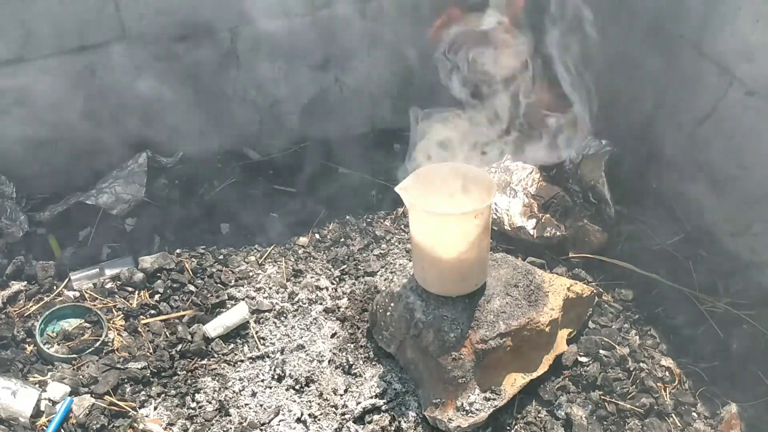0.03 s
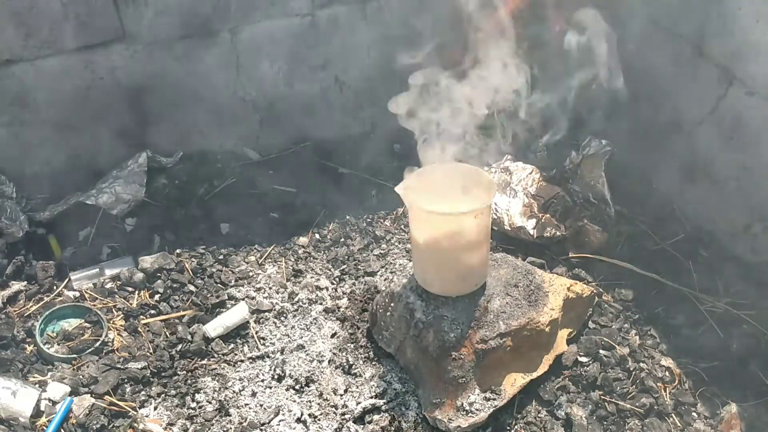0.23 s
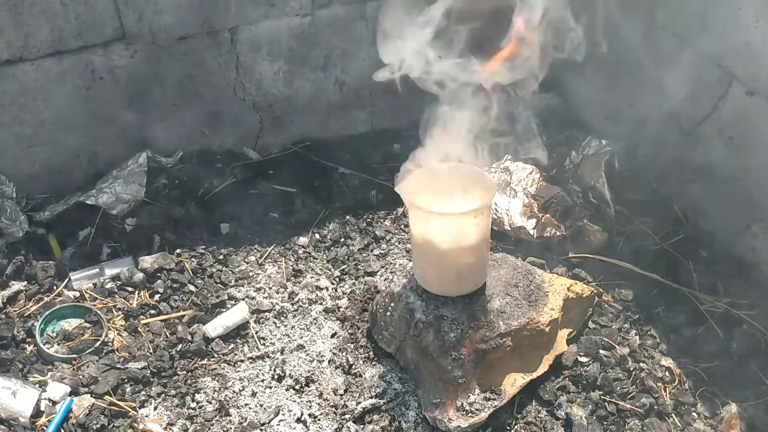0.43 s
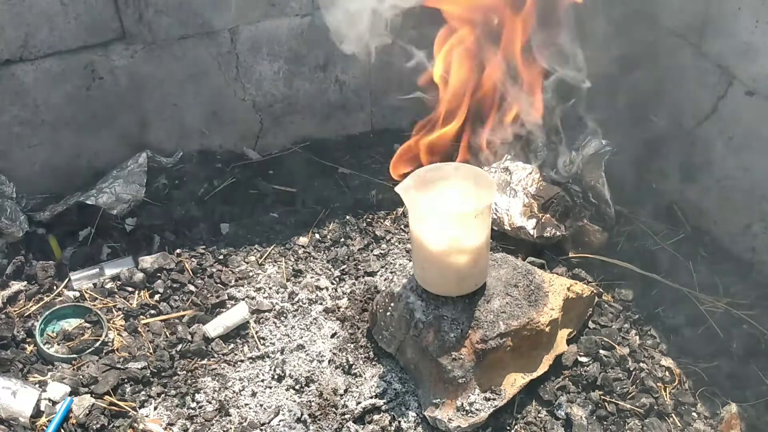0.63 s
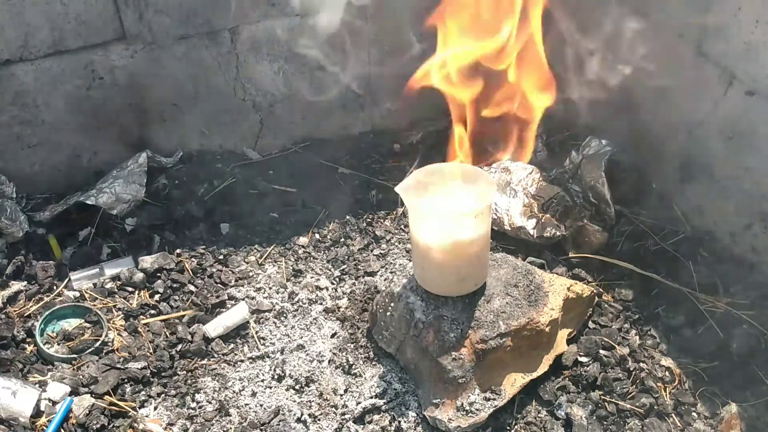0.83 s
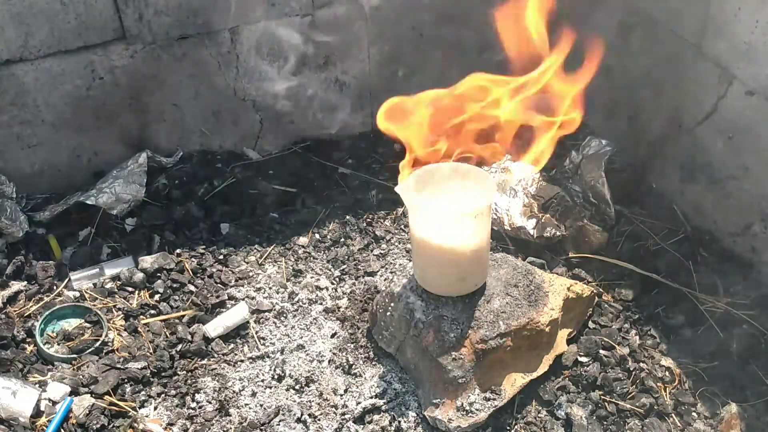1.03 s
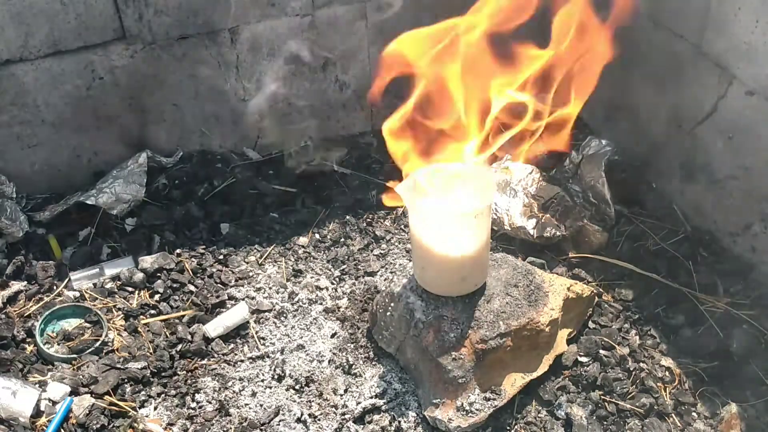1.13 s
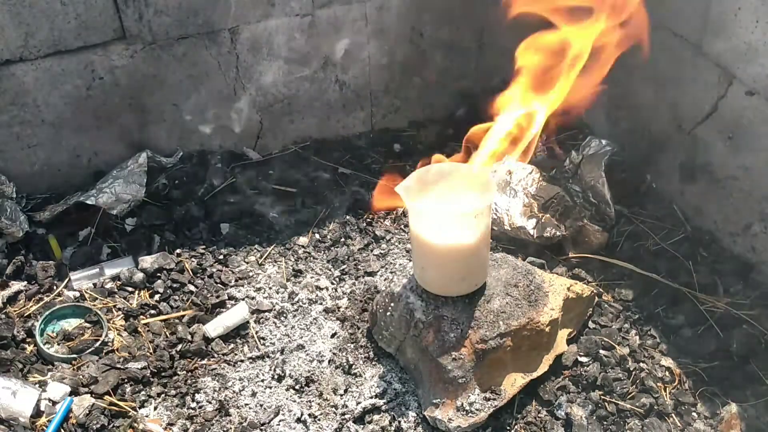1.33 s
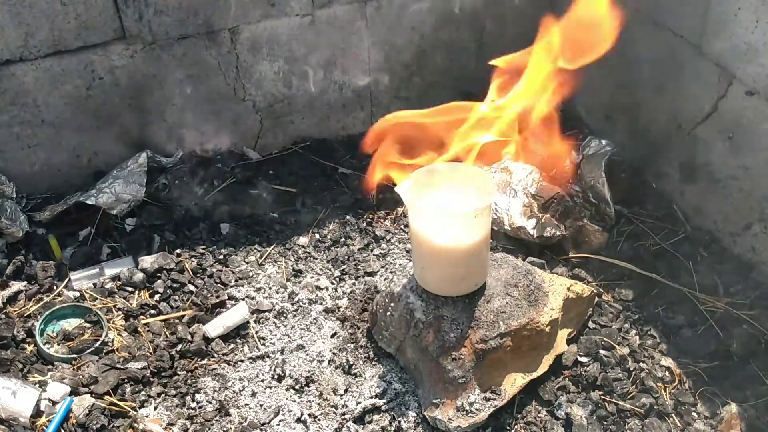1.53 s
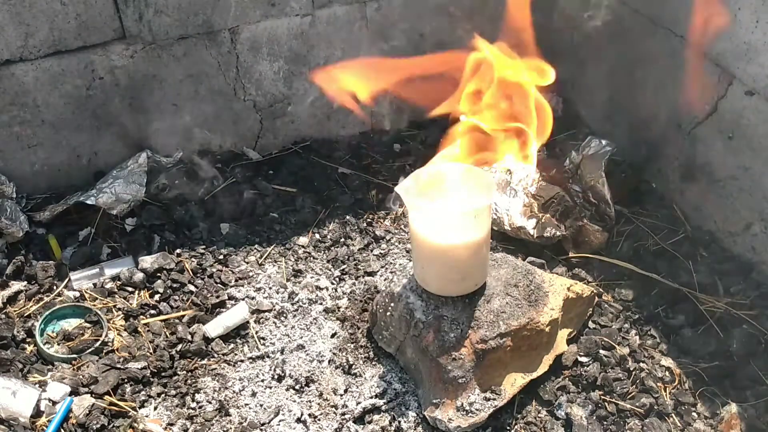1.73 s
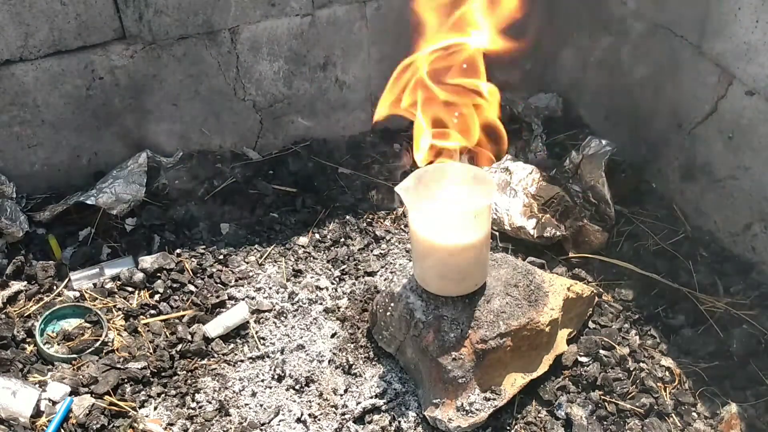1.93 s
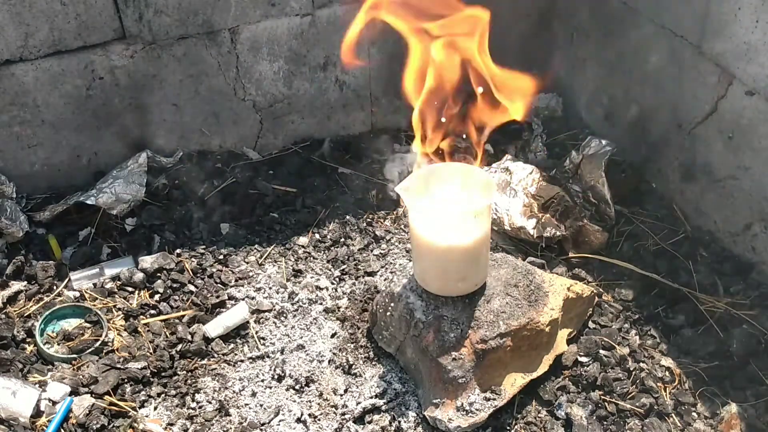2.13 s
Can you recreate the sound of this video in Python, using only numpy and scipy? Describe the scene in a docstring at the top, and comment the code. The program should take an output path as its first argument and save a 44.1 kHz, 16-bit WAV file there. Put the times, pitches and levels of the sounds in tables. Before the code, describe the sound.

Wind thumps on the microphone outdoors, over a small beaker fire's soft, low rush and fine sizzle. After faint spits at the start, gusts flutter with puffs of hiss from 0.2 to 0.8 seconds, hardest around 0.4. A lighter bump comes at 1 second. Faint crackles and a weak low hum show around 1.5 seconds, and another short gust hits at 1.8.

```python
"""Beaker fire in the wind

Outdoors, a smoking mixture in a beaker spits, catches fire and burns with a low, soft rush
and a fine sizzle. Right at the two-port microphone, gusts flutter in runs of low thumps, each
with a puff of hiss. A few faint crackles and a weak low hum lie in the background."""
import sys
import numpy as np
from scipy import signal
from scipy.fft import rfft, irfft
from scipy.io import wavfile
from scipy.ndimage import uniform_filter1d

SR = 44100
rng = np.random.default_rng(int(sys.argv[2]) if len(sys.argv) > 2 else 0)


def persist_wave(psi):
    """Save psi, clipped to +-1, as 16-bit WAV."""
    counts = np.round(np.clip(psi, -1, 1) * 32767).astype(np.int16)
    wavfile.write(sys.argv[1], SR, np.atleast_2d(counts).T)


N = 97020

# colour of the flame and open air: f/Hz, relative level/dB
RUSH_SPECTRUM = [(20, -4.5), (45, -7), (75, -1), (130, 4), (200, -5.5), (270, -8), (350, -11.5),
                 (470, -17.5), (600, -18), (850, -14), (1150, -18.5), (1500, -18), (1900, -19.5),
                 (2200, -16), (2550, -19.5), (2850, -23), (3400, -30), (4300, -34), (5500, -39),
                 (7000, -43.5), (10000, -48), (15000, -48.5)]
# rise and fall of the rush: t/s, level/dB
RUSH_LEVEL = [(0, -60.5), (.2, -58), (0.499, -56), (0.901, -60), (1.3, -60), (1.55, -62), (1.78, -58.5),
              (1.95, -59.5), (2.08, -58.5), (2.2, -61)]
def flame_rush(patch_db=2.45, flicker_db=-1):
    """The soft rush of the burning mixture and the open air, flickering in patches."""
    cells = signal.stft(rng.standard_normal((2, N)), nperseg=512, noverlap=384)[2]
    patches = uniform_filter1d(rng.standard_normal(cells.shape[1:]), size=6, axis=0)  # over frequency
    patches = unit(uniform_filter1d(patches, size=20, axis=1))  # over time
    flicker = unit(uniform_filter1d(rng.standard_normal(cells.shape[2]), size=8))
    cells = cells * amp(patch_db * patches + flicker_db * flicker)
    noise = signal.istft(cells, nperseg=512, noverlap=384)[1][:, :N]
    return ports(unit(noise), RUSH_SPECTRUM) * fader(RUSH_LEVEL)


# spits in the beaker before it ignites: t/s, level/dB, decay/s
SPITS = [(0, -65.5, 0.028), (.036, -63, 0.0089), (.06, -62.5, 0.0072), (.082, -62, 0.011)]
# colour of a spit: f/Hz, relative level/dB
SPIT_SPECTRUM = [(500, -27), (1200, 6), (2200, 3.5), (3200, -12.5), (4500, -13), (5600, -11.5), (7000, -28),
                 (15000, -39)]
# colour of the bursting bubbles: f/Hz, relative level/dB
SIZZLE_SPECTRUM = [(2000, -21), (5500, 2), (8000, -1), (15000, -0.5)]
def sputter(sizzle_db=-94, bubbles_per_s=1100, spread_db=2.5):
    """The boiling mixture spits brightly at first and keeps a fine sizzle of tiny bubbles."""
    spits = air(sum(amp(db) * puff(s, decay_s) for s, db, decay_s in SPITS), SPIT_SPECTRUM)
    bursts = rng.random(N) < bubbles_per_s / SR
    sizes = amp(spread_db * np.minimum(rng.exponential(1, N), 2))
    return spits + amp(sizzle_db) * air(unit(bursts * sizes), SIZZLE_SPECTRUM)


# gusts on the microphone: t/s, length/s, rumble/dB, hiss/dB, ring/Hz, decay/s, flutter/Hz, hollow/Hz
GUSTS = [(.086, 0.019, -55, -79, 144, 0.029, 56.5, 1180), (0.216, 0.08, -49, -59.5, 108, 0.0034, 77.4, 593),
         (.296, 0.054, -53.5, -62, 149, 0.0082, 59, 796), (.355, 0.026, -44.5, -58, 168, 0.012, 67, 585),
         (0.386, 0.071, -44.5, -54.5, 150.4, 0.0046, 71, 647),
         (0.458, 0.042, -61, -65.5, 220, 0.0043, 57, 835),
         (.561, .038, -45.5, -61.5, 169, 0.0094, 53.6, 540),
         (.604, .041, -41.5, -56.5, 157.4, 0.013, 56.3, 502),
         (0.647, 0.067, -38, -56, 128, 0.0079, 69, 670), (0.715, 0.063, -49, -58.5, 190, 0.0091, 43.3, 885),
         (0.774, 0.04, -53, -65, 147, 0.0093, 46, 880), (.919, 0.081, -66.5, -85, 158, 0.0035, 58.5, 870),
         (1.03, 0.028, -60.5, -59.5, 110, 0.0046, 56, 1114),
         (1.274, 0.059, -61, -75.5, 136, 0.027, 42, 1420),
         (1.824, 0.043, -43.5, -58.5, 174.7, 0.012, 62, 1013),
         (1.88, 0.017, -53, -62, 104, 0.0052, 51, 620)]
# colour of the churning air: f/Hz, relative level/dB
CHURN_SPECTRUM = [(20, -30), (45, -37.5), (80, 0), (140, -2), (220, 16.5), (330, -48), (600, -48.5),
                  (2000, -99)]
# colour of the wind's hiss: f/Hz, relative level/dB
HISS_SPECTRUM = [(60, -21), (250, -2), (360, -10), (550, 0), (750, -2.5), (1100, -5.5), (1550, -5.5),
                 (1900, -9), (2200, -3.5), (2550, -11.5), (2850, -8), (3300, -18.5), (4300, -23),
                 (5600, -25), (6700, -34), (8000, -32.5), (10000, -38.5), (15000, -42.5)]
def gusts(attack_s=0.0038, release_s=0.013, jitter=0.039, spread_db=0.85,
          puff_share=0.2, churn_db=-16, howl_db=-9.5):
    """Each gust is an uneven run of thumps over churning air, with pulsing hiss and a hollow howl."""
    rumble, swell, breeze, howl = np.zeros((4, N))
    for start, length, rumble_db, hiss_db, ring_hz, ring_s, flutter_hz, hollow_hz in GUSTS:
        envelope = np.minimum(since(start) / attack_s, 1) * np.exp(-since(start + length) / release_s)
        timing, strength = rng.standard_normal((12, 2)).T
        times = start + (np.arange(len(timing)) + jitter * timing) / flutter_hz
        sizes = amp(spread_db * strength) * (times < start + length + release_s)
        thumps = sum(size * thump(s, ring_hz, ring_s) for s, size in zip(times, sizes)) * envelope
        puffs = sum(size * puff(s, decay_s=0.0049) for s, size in zip(times, sizes))
        hiss_gain = amp(hiss_db) * envelope * (1 - puff_share + 2 * puff_share * puffs)
        rumble += amp(rumble_db) * unit(thumps) * np.sqrt(np.mean(envelope ** 2))
        swell += amp(rumble_db) * envelope
        breeze += hiss_gain
        howl += amp(howl_db) * hiss_gain * band(hollow_hz, width_hz=37)
    churn = amp(churn_db) * air(swell, CHURN_SPECTRUM)
    return across_ports(rumble) + churn + air(breeze, HISS_SPECTRUM) + howl


# single hits of wind on the microphone: t/s, thump/dB, slap/dB, ring/Hz, decay/s
BUFFETS = [(0.2151, -46, -53.5, 86, 0.019), (0.3814, -26, -38.5, 139.5, 0.036),
           (0.3949, -32.5, -45, 141.4, 0.039), (0.438, -39.5, -59, 145, 0.0096),
           (0.5702, -39.5, -50.5, 150, .008), (0.7079, -40, -49.5, 175, 0.009),
           (.729, -33.5, -54.5, 182.5, 0.01), (.747, -31.5, -53, 175, 0.0043),
           (0.7717, -33.5, -61, 165, 0.0028), (1.029, -43.5, -53.5, 110, 0.017),
           (1.048, -50, -75, 110, 0.0083), (1.8177, -33.5, -48.5, 142, 0.0094),
           (1.8718, -39.5, -50, 161, 0.0074)]
# colour of a slap or pop: f/Hz, relative level/dB
SLAP_SPECTRUM = [(100, 5.5), (450, -6), (1000, -9.5), (1600, -6), (2000, -15.5), (3000, -19), (5000, -34),
                 (15000, -66.5)]
def buffets(front_over_slap_db=3, front_s=0.00043, slap_s=0.005):
    """Hard pushes of air: a steep pressure front, a short slap and a thump."""
    thumps = sum(amp(db) * thump(s, hz, decay_s) for s, db, _, hz, decay_s in BUFFETS)
    fronts = sum(amp(db + front_over_slap_db) * puff(s, front_s) for s, _, db, _, _ in BUFFETS)
    slaps = sum(amp(db) * puff(s, slap_s) for s, _, db, _, _ in BUFFETS)
    return across_ports(thumps) + pop(fronts) + air(slaps, SLAP_SPECTRUM)


# whistle at the left port: t/s, level/dB
WHISTLE_LEVEL = [(0, -77.5), (.3, -89), (.4, -68.5), (.53, -77), (.62, -83), (0.681, -57.5), (.76, -75.5),
                 (.93, -74), (1.05, -79), (1.2, -71), (1.45, -84.5), (1.86, -78), (2.2, -87)]
def wind_whistle():
    """A narrow band of the hiss, loudest at the time of the strongest gust."""
    hz = np.fft.rfftfreq(N, 1 / SR)
    left = band(centre_hz=2868, width_hz=110) * fader(WHISTLE_LEVEL)
    to_right = amp(-read(PORT_BALANCE, hz)) * np.exp(-1j * read(PORT_PHASE, hz))
    return np.array([left, irfft(rfft(left) * to_right, N)])


# faint crackles in the beaker: t/s, level/dB
CRACKLES = [(0.169, -52), (.193, -56), (0.319, -54), (.347, -43), (1.435, -53), (1.448, -48),
            (1.471, -48.5), (1.529, -47), (1.972, -47.5), (2.076, -45.5)]
def crackles():
    """Small dull pops, each a single pressure pulse."""
    return pop(sum(amp(db) * puff(s, decay_s=0.00009) for s, db in CRACKLES))


# hum in the background: t/s, level/dB
HUM_LEVEL = [(0, -75), (1.04, -74), (1.13, -64.5), (1.21, -73.5), (1.31, -68), (1.45, -69), (1.51, -76),
             (1.58, -67.5), (1.71, -65), (1.78, -71), (2.05, -75), (2.2, -72)]
# narrow bands of the drone: f/Hz, width/Hz, level/dB
DRONE_BANDS = [(601.7, 10, -80.5), (649, 10, -78.5), (814, 10, -78.5), (886, 5.6, -81.5), (1131, 39, -85.5)]
def hum(drone_rise_s=0.11):
    """A weak low hum that wavers in pitch, over a faint hollow drone that fades in at the start."""
    phase = np.angle(signal.hilbert(band(centre_hz=236.9, width_hz=8.1)))
    drone = sum(amp(db) * band(hz, width) for hz, width, db in DRONE_BANDS)
    return fader(HUM_LEVEL) * unit(np.cos(phase)) + drone * np.minimum(since(0) / drone_rise_s, 1)


# phase between the microphone's ports: f/Hz, left lead/rad
PORT_PHASE = [(200, 0.5), (800, 0.36), (1300, -0.17), (1560, 1.34), (1700, -2), (1850, -3), (2450, -3),
              (2700, -5), (2980, -4.5), (3120, -6), (3950, -6), (4250, -4), (4750, -4), (5150, -4.5),
              (5850, -6), (6300, -1), (7100, -5.5), (7800, -5.5)]
# how alike the ports sound: f/Hz, coherence/0-1
PORT_COHERENCE = [(80, 0.18), (350, 0.55), (600, 0.88), (1100, 0.95), (1450, 1), (1700, 0.22), (2100, 0.97),
                  (3300, 0.83), (4000, 0.79), (4600, 1), (6500, 0.65), (12000, 0.074)]
# balance of the ports: f/Hz, left minus right/dB
PORT_BALANCE = [(140, 1), (300, -4), (600, 0.9), (800, 0), (2000, -1), (2550, 1.5), (2850, 6), (3200, 0.5),
                (8000, 2), (15000, 1)]
# peaks and dips of a hollow colour at both ports: f/Hz, width/Hz, gain/dB
HOLLOW_COLOUR = [(421, 17, 1.5), (497.4, 8.7, 8), (562, 15, 10.5), (651, 23, 4.5), (902, 20, 2.5),
                 (920, 40, -3), (1091, 12, 6.5), (1274, 15, -8), (1342, 22, 3), (1749, 39, -12.5),
                 (3110, 31, -8), (3204, 86, 5.5)]
def ports(pair, spectrum):
    """Colours two signals and blends them as the microphone's two ports hear them."""
    hz = np.fft.rfftfreq(N, 1 / SR)
    left, other = rfft(pair)
    hollow_db = sum(db * np.exp(-((hz - centre) / width) ** 2) for centre, width, db in HOLLOW_COLOUR)
    colour = unit(amp(read(spectrum, hz) + hollow_db))
    coherence = np.clip(read(PORT_COHERENCE, hz), 0, 1)
    blend = coherence * left + np.sqrt(1 - coherence ** 2) * other
    right = blend * np.exp(-1j * read(PORT_PHASE, hz))
    tilt_db = read(PORT_BALANCE, hz) / 2
    return irfft(np.array([left * amp(tilt_db), right * amp(-tilt_db)]) * colour, N)


def across_ports(pressure, balance_db=4.5, lead_rad=0.84):
    """Wind pressure reaches the right port a little earlier and the left one harder."""
    right = (signal.hilbert(pressure) * np.exp(1j * lead_rad)).real
    return np.array([pressure * amp(balance_db / 2), right * amp(-balance_db / 2)])


def air(envelope, spectrum):
    """Noise of moving air under an envelope."""
    return ports(rng.standard_normal((2, N)) * envelope, spectrum)


def pop(pulses):
    """Sudden drops of pressure, dulled, as the two ports hear them."""
    return ports(np.array([-pulses, np.zeros(N)]), SLAP_SPECTRUM)


def thump(s, hz, decay_s, rise_s=0.0014):
    """One push of air: a low ring that dies in a few cycles."""
    t = since(s)
    return -np.sin(2 * np.pi * hz * t) * np.exp(-t / decay_s) * (1 - np.exp(-t / rise_s))


def puff(s, decay_s):
    """A sudden rise and an exponential fall."""
    t = since(s)
    return (t > 0) * np.exp(-t / decay_s)


def band(centre_hz, width_hz):
    """A narrow band of noise: a wavering tone."""
    hz = np.fft.rfftfreq(N, 1 / SR)
    bell = np.exp(-((hz - centre_hz) / width_hz) ** 2)
    return unit(irfft(rfft(rng.standard_normal(N)) * bell, N))


def fader(points):
    """Gain over time from a table of levels."""
    return amp(np.interp(since(0), *np.transpose(points)))


def read(points, hz):
    """Reads a table on a log-frequency axis."""
    f, value = np.transpose(points)
    return np.interp(np.log(hz + 1), np.log(f + 1), value)


def since(s):
    """Seconds since the moment s, zero before it."""
    return np.maximum(np.arange(N) / SR - s, 0)


def amp(db):
    """Decibels to gain."""
    return 10 ** (np.asarray(db) / 20)


def unit(x):
    """Scales to rms 1."""
    return x / np.sqrt(np.mean(x ** 2) + 1e-20)


def scene():
    """Fire, background and wind together at the microphone."""
    return flame_rush() + wind_whistle() + hum() + crackles() + sputter() + gusts() + buffets()


def record(dry, low_cut_hz=58, band_limit_hz=15450):
    """The microphone's low cut, then the band limit."""
    cut = signal.sosfilt(signal.butter(2, low_cut_hz, "high", fs=SR, output="sos"), dry)
    lowpass = signal.firwin(511, band_limit_hz, window=("kaiser", 9), fs=SR)
    return signal.oaconvolve(cut, lowpass[None], "same")


dry = scene()
out = record(dry)
persist_wave(out)
```